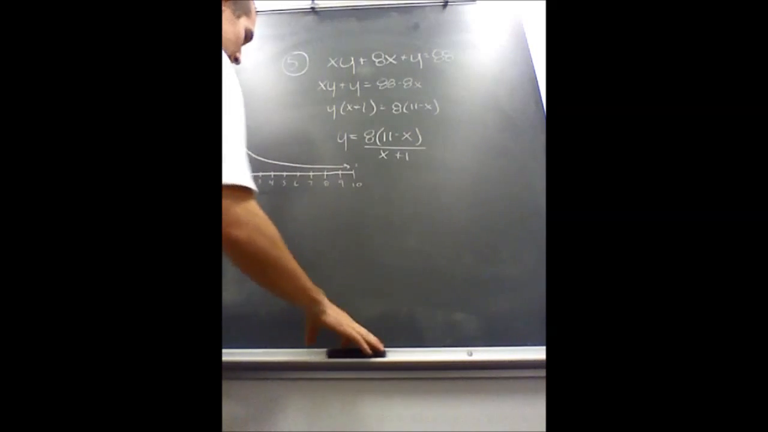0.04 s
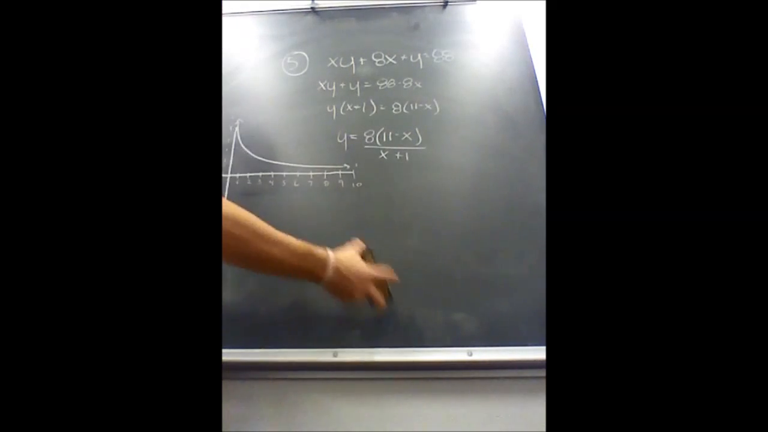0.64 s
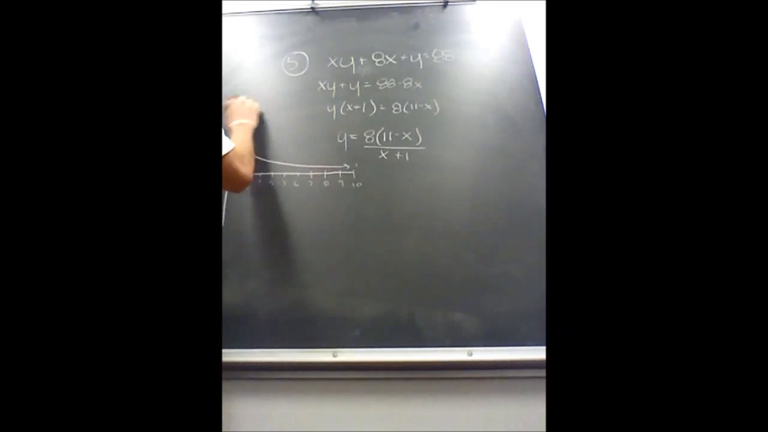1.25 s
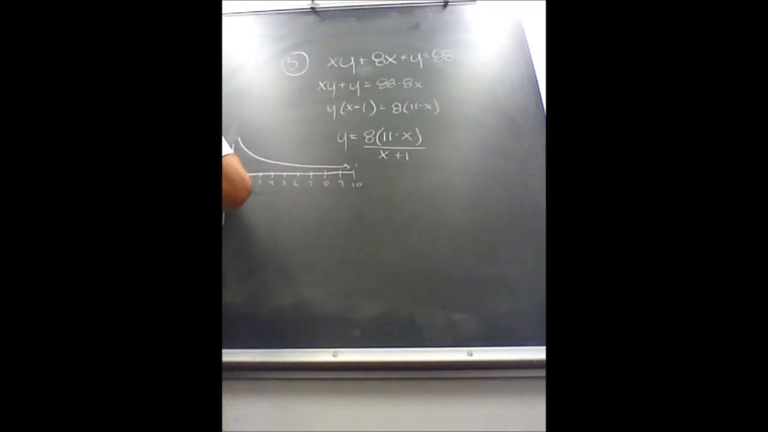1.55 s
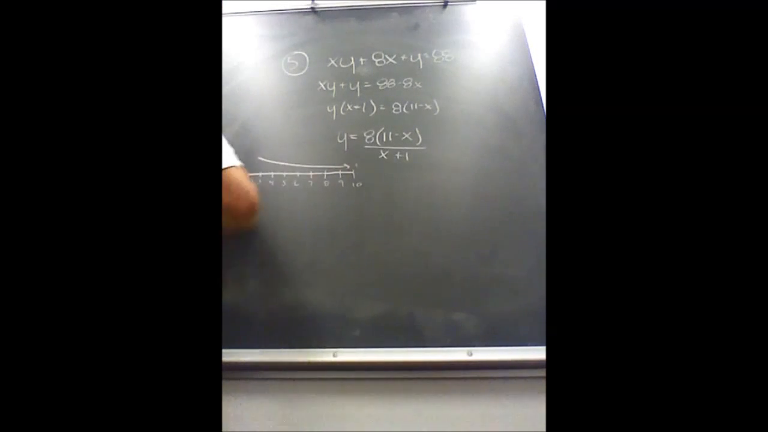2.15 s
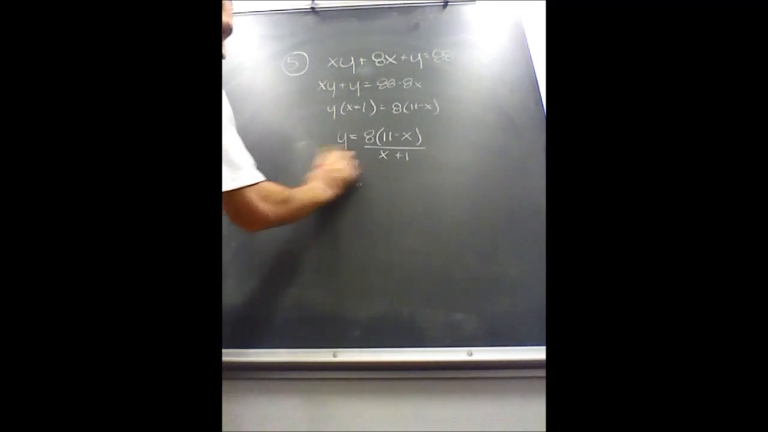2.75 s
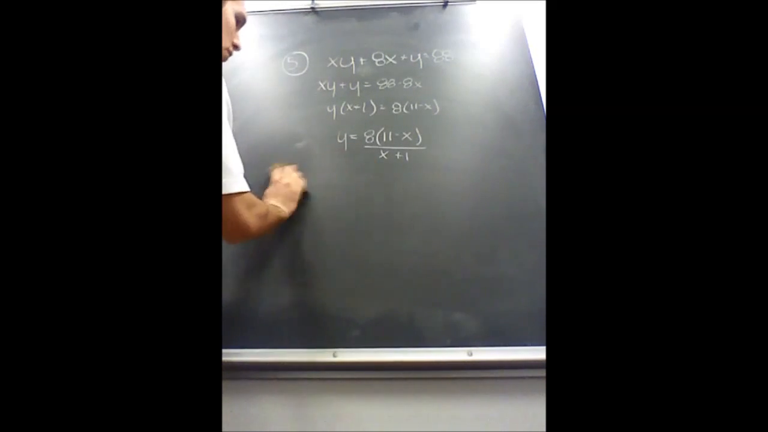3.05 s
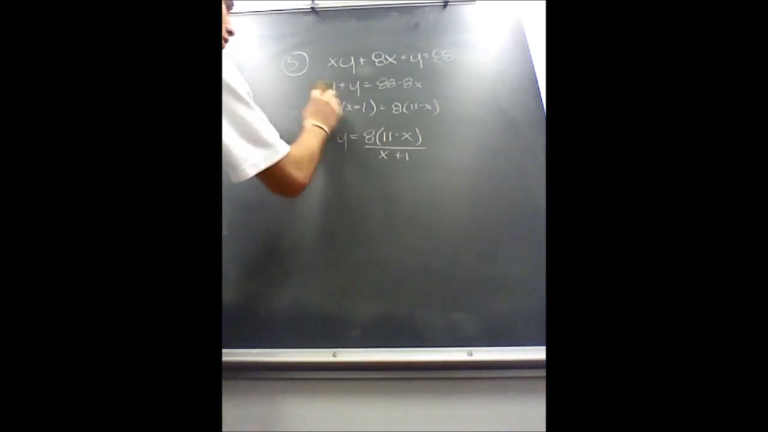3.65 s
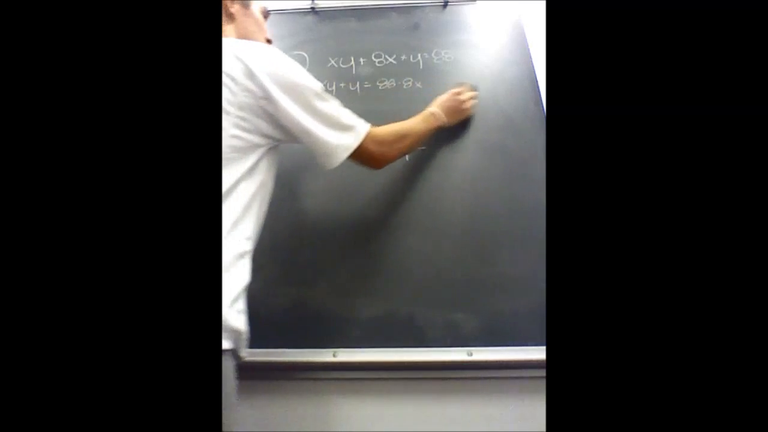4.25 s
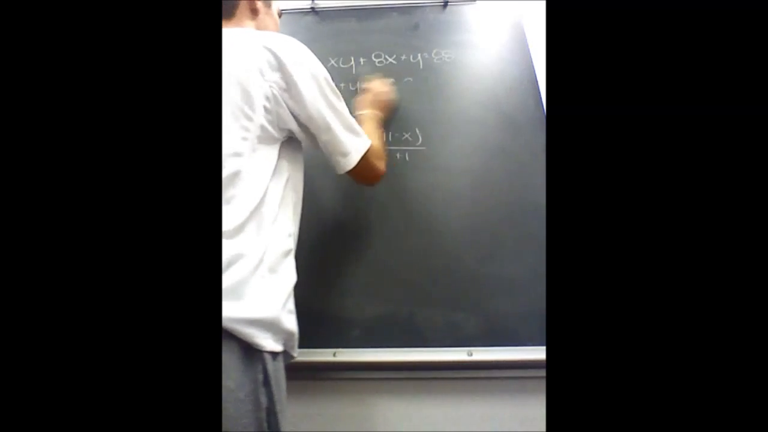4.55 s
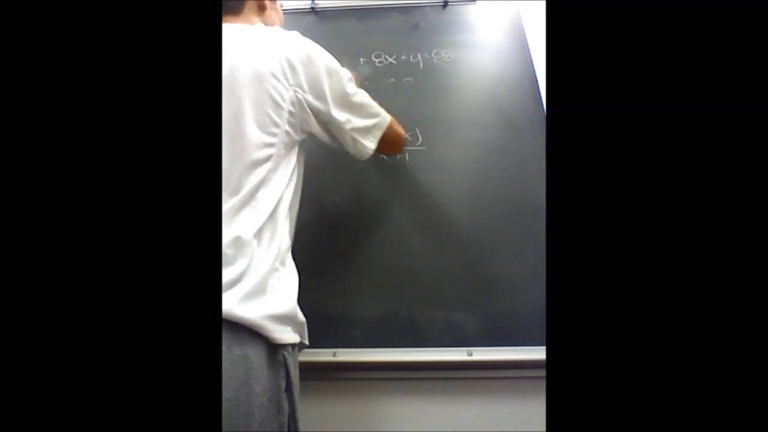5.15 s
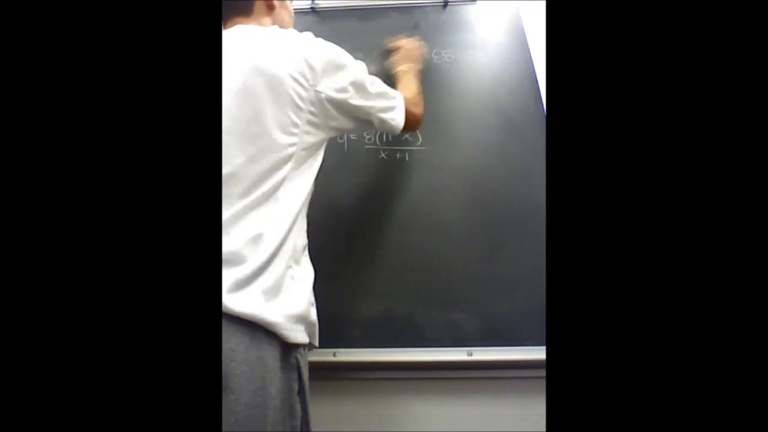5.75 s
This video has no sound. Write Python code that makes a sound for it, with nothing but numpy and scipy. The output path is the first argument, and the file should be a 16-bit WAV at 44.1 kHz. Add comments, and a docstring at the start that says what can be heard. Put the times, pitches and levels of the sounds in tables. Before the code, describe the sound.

A felt eraser scrapes off a metal tray, then rubs to and fro across a chalkboard, with one sharp knock midway.

```python
"""A classroom, one microphone within earshot of a sleeve; ventilation and mains hum run throughout.
A felt eraser bumps and scrapes along the metal chalk tray, which rings thinly, and clothing rustles.
The eraser meets the chalkboard and rubs to and fro, each stroke swelling and fading with hand speed:
fibres hiss, chalk dust rasps, the panel murmurs. Now and then a narrow band of hiss glides in pitch.
Past halfway the eraser is lifted with another rustle and knocked back on, and the wiping goes on."""
import sys
import numpy as np
from scipy import signal
from scipy.fft import rfft, irfft
from scipy.io import wavfile
from scipy.ndimage import uniform_filter1d, map_coordinates

SR = 44100
rng = np.random.default_rng(int(sys.argv[2]) if len(sys.argv) > 2 else 0)


def log_audio(samples):
    """Write samples as a 16-bit WAV file to the path given in sys.argv[1]."""
    # one column per channel
    frames = np.atleast_2d(samples).T
    # limit to full scale, then quantise
    limited = np.clip(frames, -1, 1)
    pcm = np.round(limited * 32767).astype(np.int16)
    wavfile.write(sys.argv[1], SR, pcm)


N = 255118
T = np.arange(N) / SR


def undb(db):
    """Decibels to gain."""
    return 10 ** (np.asarray(db) / 20)


def unit(x):
    """Scale to rms 1."""
    return x / np.sqrt(np.mean(x ** 2))


def decay(t60):
    """One second of an envelope that falls 60 dB in t60 seconds."""
    return np.exp(-np.log(1000) * T[:SR] / t60)


def along(points, hz):
    """Read a table on a log-frequency axis."""
    f, value = np.transpose(points)
    return np.interp(np.log(hz + 1e-9), np.log(f), value)


def colour(x, points):
    """Give x a spectrum, at rms 1; the bass falls away under the first point."""
    hz = np.arange(len(x) // 2 + 1) * SR / len(x)
    gain = undb(along(points, hz)) * np.minimum(hz / points[0][0], 1) ** 2
    return unit(irfft(rfft(x) * gain, len(x)))


def resonate(x, rings):
    """Drive a few resonances with x; the result has rms 1."""
    hz = np.arange(N // 2 + 1) * SR / N
    response = sum(undb(db) / (1 + 2j * (hz - f) / width) for f, width, db in rings)
    return unit(irfft(rfft(x) * response, N))


def walk(rate_hz):
    """Smooth random wandering with a spread near 1."""
    hold = max(int(SR / rate_hz), 1)
    steps = np.repeat(rng.standard_normal(N // hold + 1), hold)
    return unit(uniform_filter1d(uniform_filter1d(steps, hold), hold)[:N])


def slips(per_s, judder_db, spread_db=0):
    """Dense tiny stick-slip releases of uneven but bounded size, bunched by the judder of the hand."""
    hit = rng.random(N) < per_s / SR
    scatter = np.clip(rng.standard_normal(N), -2, 2)
    judder = np.clip(walk(90), -2, 2)
    return hit * rng.uniform(-0.98, 1, N) * undb(spread_db * scatter + judder_db * judder)


def speed(start, length, fastest=0.47, overlap_s=0):
    """One movement of the hand: speed rises from rest to 1 and falls back in a rounded arch."""
    peak = start + np.clip(fastest, .02, .98) * length
    return 1 - np.interp(T, [start - overlap_s, peak, start + length + overlap_s], [-1, 0, 1]) ** 2


def friction(moves, power, overlap_s=0, level_column=0):
    """Gain over a run of rubbing movements: each one's level times a power of its speed."""
    gains = (undb(levels[level_column]) * speed(start, length, fastest, overlap_s) ** power
             for start, length, fastest, *levels in moves)
    return np.sqrt(sum(gain ** 2 for gain in gains))


def room(x, wet_db, gap_s=0.0055):
    """Direct sound reaches the microphone, then the classroom's diffuse tail, whose treble dies first."""
    # Reverberation. Each row: frequency in Hz, time to fall 60 dB in seconds.
    decay_times = [(100, 1), (300, 0.77), (700, 0.54), (2000, 0.35), (5000, 0.19), (10000, 0.074)]
    centres_hz, t60s = np.transpose(decay_times)
    spectrum, hz = rfft(rng.standard_normal(SR)), np.arange(SR // 2 + 1)
    tail = 0
    for share, t60 in zip(np.eye(len(t60s)), t60s):
        band = along(np.c_[centres_hz, share], hz)
        tail = tail + irfft(spectrum * band, SR) * decay(t60)
    tail = tail * (T[:SR] > gap_s)
    wet = signal.fftconvolve(x, tail / np.linalg.norm(tail))[:N]
    return x + undb(wet_db) * wet


def ventilation(level_db=-51.5):
    """Moving air rumbles and hisses softly, its level wandering a little."""
    # Air spectrum. Each row: frequency in Hz, relative level in dB.
    air_colour = [(40, -11), (60, -10), (85, -7), (118, -2.5), (160, -6.5), (235, -6), (300, -9), (395, -8),
                  (450, -11.5), (700, -13), (1100, -15), (1650, -17), (5000, -21), (10400, -18.5)]
    return colour(rng.standard_normal(N), air_colour) * undb(level_db + .5 * walk(2.85))


def mains_hum(hum_hz=120):
    """The lights hum on multiples of twice the mains rate."""
    # Hum partials. Each row: multiple of hum_hz, rms level in dB.
    partials = [(1, -65.5), (2, -68), (3, -90), (4, -68), (5, -72), (6, -71), (7, -76), (8, -74.5),
                (9, -71), (11, -83.5)]
    hum = 0
    for multiple, db in partials:
        amplitude = np.sqrt(2) * undb(db + 0.5 * walk(2.3))
        hum = hum + amplitude * np.sin(2 * np.pi * (multiple * hum_hz * T + rng.random()))
    return hum


def tray(scrape_db=1, coast_s=0.011):
    """The eraser scrapes along the chalk tray, which sings thinly when the edge bites."""
    # Shoves along the tray and off its lip. Each row: start and length in seconds,
    # fastest point as a share of the length, relative levels of scrape and ringing in dB.
    shoves = [(.199, 0.19, .08, -46, -42.5), (.385, 0.071, 0.56, -46, -44.5), (.47, .125, .7, -47.5, -54),
              (.605, 0.047, 0.52, -50, -37.5), (.692, 0.016, .4, -53.5, -58)]
    # Scrape spectrum. Each row: frequency in Hz, relative level in dB.
    scrape_colour = [(150, -11), (400, -5.5), (700, -14), (1070, -6.5), (1400, -12), (2100, -3.5),
                     (3500, -4.5), (5400, -3), (7000, 1.5), (9000, 4.5), (10400, -7)]
    # Resonances of the metal. Each row: frequency and width in Hz, relative level in dB.
    rings = [(6170, 180, -16), (7000, 140, -11), (7920, 100, -3.5), (8530, 88, 1.5), (9300, 140, -4),
             (9910, 48, 0)]
    scrape = colour(slips(per_s=5000, judder_db=0.5), scrape_colour)
    scrape *= friction(shoves, power=.35, overlap_s=coast_s, level_column=0)
    singing = resonate(slips(per_s=7000, judder_db=1.4), rings)
    singing *= friction(shoves, power=0.68, overlap_s=coast_s, level_column=1)
    return room(undb(scrape_db) * scrape + singing, wet_db=-3.5)


def board_ring(clear_db=-29, crowded_db=-18.5, crowded_t60=0.39):
    """The board's answer to one tap: clear modes among many crowded ones."""
    # Clear modes. Each row: frequency in Hz, relative level in dB, time to fall 60 dB in seconds.
    # The last two are the quickly damped patch under the eraser.
    modes = [(120, -19, .6), (205, -13, .35), (243, -4, .55), (307, -3, .42), (414, -4, .35),
             (452, -2, .35), (525, 0, .3), (557, 3, .32), (571, 0, .3), (634, 2, .3), (650, 4, .33),
             (721, -3, .28), (753, 2, .32), (770, -2, .3), (850, 4, .3), (884, -3, .26), (919, -3, .26),
             (945, -2, .28), (993, -1, .3), (1012, -1, .3), (1103, -4, .3), (1216, -8, .3),
             (1608, -12, .25), (560, 16, .07), (810, 13, .06)]
    # Spectrum of the crowded modes. Each row: frequency in Hz, relative level in dB.
    crowded_colour = [(110, -26), (175, -33), (225, -6), (310, 0), (450, -5), (600, 6), (850, 2),
                      (1100, -0.5), (1400, -17), (2500, -4), (5000, -33)]
    # neighbouring modes swing in opposite directions
    clear = sum((-1) ** k * undb(db) * np.sin(2 * np.pi * hz * T[:SR]) * decay(t60)
                for k, (hz, db, t60) in enumerate(modes))
    crowded = colour(rng.standard_normal(SR), crowded_colour) * decay(crowded_t60)
    return undb(clear_db) * clear + undb(crowded_db) * crowded


def knocks(slap_db=-8, slap_s=0.0022, click_db=17, click_low_hz=270, lowest_hz=85):
    """Each blow is a short push that clicks, rings the board and squeezes a slap out of the felt."""
    # The eraser meeting tray and board. Each row: start in seconds, push in dB, contact time in ms,
    # offsets from the push for click and slap in dB.
    # The last two are the big knock: a corner lands first, then the flat face.
    blows = [(0.212, -22, 2.4, 2, -30), (0.268, -12, 5, 0, -40), (1.256, -37, 0.35, 7, 1),
             (1.297, -10, 5, -2, -40), (3.638, -35, 0.8, -12, -18), (3.8876, -9, 0.25, 6.5, -15),
             (3.8928, -1.5, 0.42, -11, -4)]
    # Spectrum of the felt slap. Each row: frequency in Hz, relative level in dB.
    slap_colour = [(300, 3), (1000, 4), (2500, -8.5), (4500, -3), (6700, 0), (8000, -4), (10400, -8)]
    force, jolt, squeeze = np.zeros((3, N))
    for start, push_db, contact_ms, edge_db, felt_db in blows:
        age = np.maximum(T - start, 0)
        push = np.sin(np.pi * np.minimum(age * 1e3 / contact_ms, 1))
        push = undb(push_db) * push / push.sum()
        force += push
        jolt += undb(edge_db) * push
        squeeze += undb(push_db + felt_db) * (T > start) * np.exp(-age / slap_s)
    board = signal.fftconvolve(force, board_ring())[:N]
    # the small block radiates its click poorly in the bass
    bass_cut = signal.butter(3, click_low_hz, "high", fs=SR, output="sos")
    click = undb(click_db) * signal.sosfilt(bass_cut, jolt)
    slap = undb(slap_db) * squeeze * colour(rng.standard_normal(N), slap_colour)
    sound = room(board, wet_db=-22.0) + room(click + slap, wet_db=-2)
    # below lowest_hz the panel moves hardly any air
    return signal.sosfilt(signal.butter(2, lowest_hz, "high", fs=SR, output="sos"), sound)


def sleeve(level_db=-1.0):
    """Cloth brushes on cloth while the arm swings free, heard close and dry; one brief brush is the felt first
    touching the board."""
    # Arm swings, and at 1.199 s the felt's first light touch on the board. Each row: start and length in
    # seconds, # fastest point as a share of the length, relative level in dB.
    swings = [(.66, 0.9, 0.81, -52.5), (.885, .04, 0.31, -47), (1.005, .05, .3, -52),
              (1.075, 0.088, .7, -43), (1.199, 0.047, .1, -43.5), (3.6, .17, 0.39, -42.5)]
    # Rustle spectrum. Each row: frequency in Hz, relative level in dB.
    cloth_colour = [(500, 0), (1500, -5), (2800, -3), (5000, -1.5), (8000, 4.5), (10400, 2)]
    rustle = colour(slips(per_s=5500, judder_db=-1.0, spread_db=0.5), cloth_colour)
    return rustle * friction(swings, power=0.95) * undb(level_db)


def swishes(width_hz=700):
    """Now and then a narrow band of hiss glides up or down in pitch."""
    # Each row: start and length in seconds, first and last pitch in Hz, relative level in dB.
    glides = [(1.085, 0.064, 2610, 3500, -51), (1.697, 0.096, 4280, 3100, -42),
              (2.094, 0.16, 4810, 3430, -40), (3.281, .25, 2384, 2098, -47)]
    lowpass = signal.butter(2, width_hz / 2, fs=SR, output="sos")
    flutter = unit(signal.sosfilt(lowpass, rng.standard_normal(N)))  # widens each tone into a band
    tones = 0
    for start, length, first_hz, last_hz, db in glides:
        hz = np.interp(T, [start, start + length], [first_hz, last_hz])
        tones = tones + undb(db) * speed(start, length) * np.sin(2 * np.pi * np.cumsum(hz) / SR)
    return room(flutter * tones, wet_db=-6.0)


def wiping(hiss_db=2.0, panel_db=-0.5, copy_db=-14):
    """Felt on slate: fine fibres hiss, chalk dust rasps, and the panel radiates the low part."""
    # Strokes, from one turn of the hand to the next. Each row: start and length in seconds,
    # fastest point as a share of the length, relative levels of hiss, rasp and panel in dB.
    strokes = [(1.255, 0.16, 0.19, -36, -45, -55), (1.43, 0.28, 0.55, -32, -46, -63),
               (1.70, 0.26, 0.12, -29.5, -42, -58), (1.965, 0.25, 0.88, -31, -47, -56.5),
               (2.24, 0.27, 0.35, -28.5, -42, -56.5), (2.53, 0.23, 0.7, -31, -46.5, -60),
               (2.745, 0.26, 0.34, -29.5, -41.5, -64), (3.03, 0.19, 1, -31, -42, -74),
               (3.268, 0.25, 0.27, -29.5, -41, -68), (3.965, 0.54, .6, -28.5, -39.5, -52),
               (4.535, 0.39, .6, -32.3, -48, -60), (4.91, 0.29, 0.58, -32, -43.5, -55),
               (5.215, 0.14, 0.52, -36.5, -50.5, -62.5), (5.355, 0.23, 0.67, -31, -42, -54),
               (5.61, 0.39, 0.85, -29.5, -40.5, -56)]
    # Spectra of fibres, dust and panel. Each row: frequency in Hz, relative level in dB.
    hiss_colour = [(1500, -47), (3500, -15.5), (5000, -8), (6500, -3), (8500, 1.5), (10400, -3.5)]
    rasp_colour = [(400, -23.5), (1000, -11.5), (1500, -10), (2200, -1), (3200, -1.5), (4300, -2),
                   (5500, -3.5), (9000, -13.5)]
    panel_colour = [(120, -3), (250, -20), (450, -10.5), (750, -0.5), (1100, 2), (1500, -5.5),
                    (2500, -21.5)]
    turn_s = .024  # the hand turns in a loop, so each stroke runs this far into its neighbours
    hiss = colour(slips(per_s=15000, judder_db=0.75), hiss_colour)
    hiss *= friction(strokes, power=0.57, overlap_s=turn_s, level_column=0)
    rasp = colour(slips(per_s=7000, judder_db=1.08), rasp_colour)
    rasp *= friction(strokes, power=0.32, overlap_s=turn_s, level_column=1)
    panel = colour(slips(per_s=3000, judder_db=1.5), panel_colour)
    panel *= friction(strokes, power=0.28, overlap_s=turn_s, level_column=2)
    felt = undb(hiss_db) * hiss + rasp
    # a faint copy with a wandering delay sweeps shallow notches through the hiss
    lag_s = .003 + 0.000402 * walk(2.7)
    delayed = map_coordinates(felt, [(T - lag_s) * SR], order=3)
    return room(felt + undb(copy_db) * delayed + undb(panel_db) * panel, wet_db=-7.0)


def scene():
    """Everything as it reaches one microphone."""
    return (ventilation() + mains_hum() + tray() + knocks() + sleeve() + swishes() + wiping())[None]


def record(dry):
    """The recorder cuts the top steeply."""
    top_hz = 10500
    return signal.sosfilt(signal.ellip(12, .1, 80, top_hz, fs=SR, output="sos"), dry)


dry = scene()
out = record(dry)
log_audio(out)
```